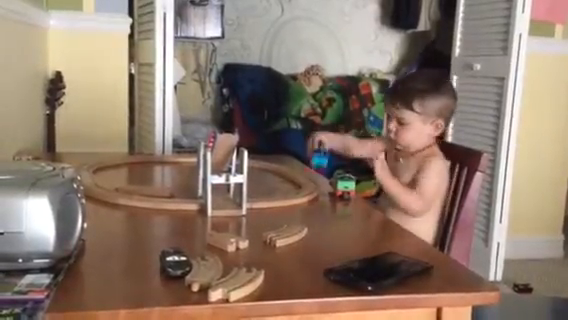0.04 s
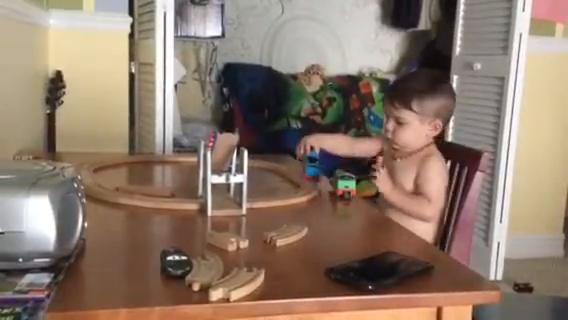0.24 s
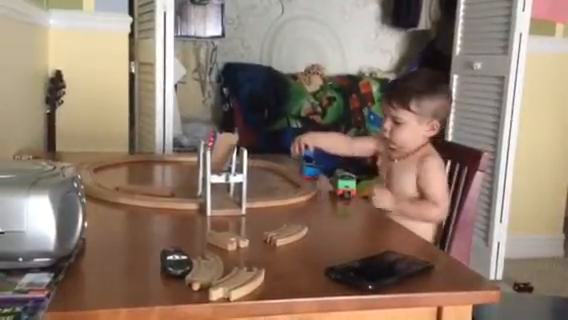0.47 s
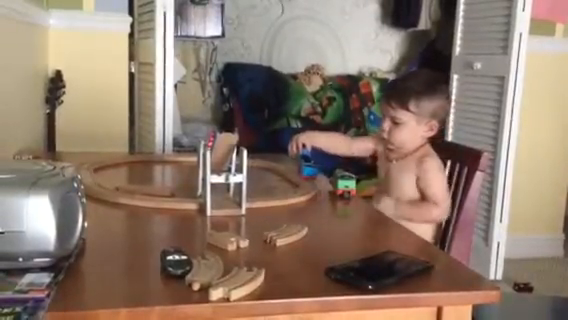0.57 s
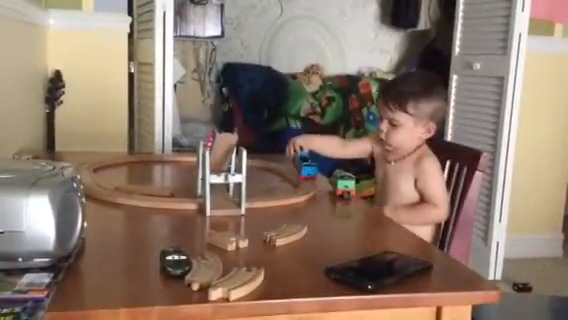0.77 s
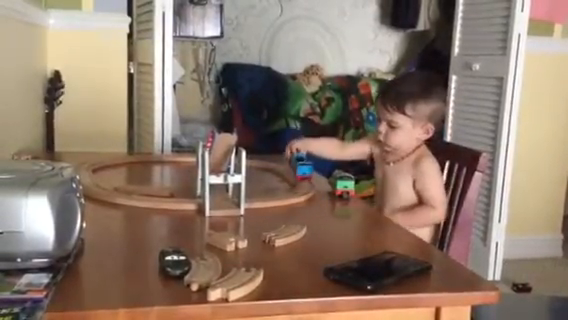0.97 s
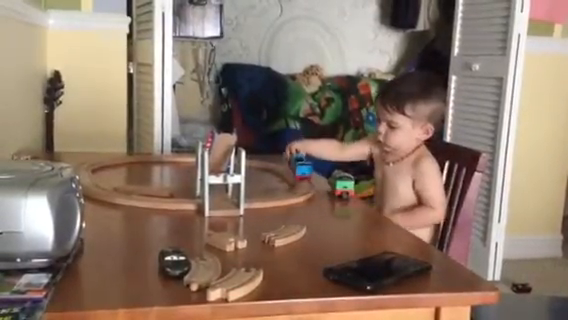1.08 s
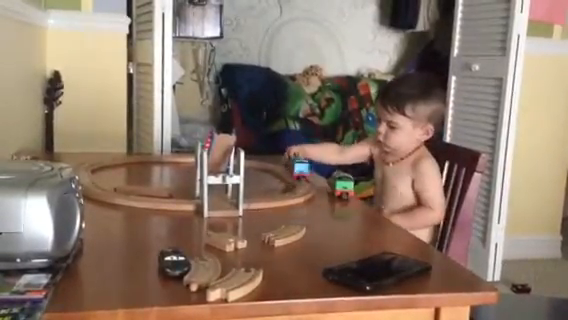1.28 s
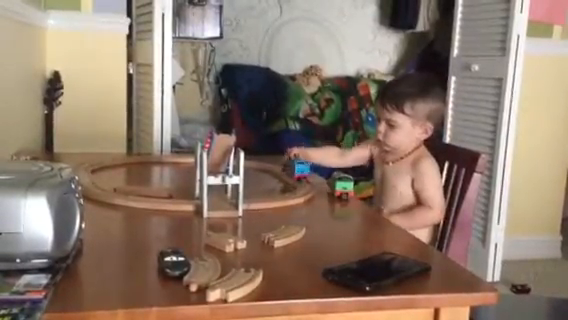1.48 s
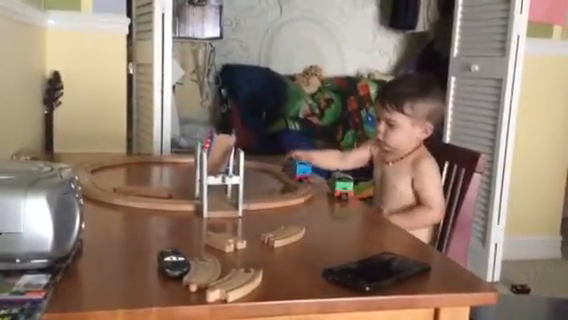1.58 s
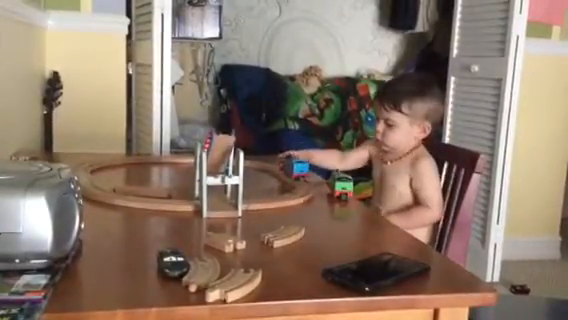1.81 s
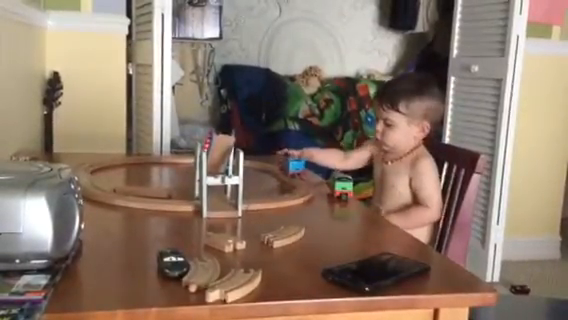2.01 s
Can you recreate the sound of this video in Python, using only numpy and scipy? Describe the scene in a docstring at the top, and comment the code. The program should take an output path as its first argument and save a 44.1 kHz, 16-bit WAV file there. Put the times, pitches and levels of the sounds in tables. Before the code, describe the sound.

A toy train clacks down on wooden rails on a table, then rolls in two short pushes, its plastic wheels clicking and rubbing between light knocks. The microphone is nearby in a small room with a faint hum.

```python
"""A tick, then a clack: a small plastic toy engine lands on a wooden track on a living-room table. It creeps,
then is pushed along twice. Its loose wheels click against their axles and rub in the grooves, the wood grain
rattles its plastic body, and its coupling ticks. Knocks against the rails ring the track, and the table top
thuds and rumbles underneath. The room rings briefly over a low, wavering hum."""
import sys
import numpy as np
from scipy import signal
from scipy.fft import rfft, irfft
from scipy.io import wavfile

SR = 44100
rng = np.random.default_rng(int(sys.argv[2]) if len(sys.argv) > 2 else 0)


def wav_record(signal):
    """Record a signal, one row per channel, as 16-bit PCM in the file named by sys.argv[1]."""
    frames = np.transpose(np.atleast_2d(signal))
    bounded = np.clip(frames, -1, 1)
    # unit amplitude maps onto the largest positive 16-bit level
    quanta = np.round(bounded * 32767).astype(np.int16)
    wavfile.write(sys.argv[1], SR, quanta)


N = 90404
TIME = np.arange(N) / SR

# A loose wheel clicks on its axle. Each row: start in seconds, relative level in dB.
AXLE_CLICKS = [(0.4600, -35), (0.5040, -37), (0.5260, -43), (0.7530, -29.5), (0.7608, -24), (0.7690, -28),
               (0.7803, -18.5), (0.7910, -19.5), (0.8015, -19.5), (0.8045, -23.5), (0.8125, -29),
               (0.8258, -27), (0.8412, -19.5), (0.8565, -17.5), (0.8684, -18.5), (0.8712, -18),
               (0.8812, -28), (0.8950, -16), (0.9060, -18.5), (0.9248, -22), (0.9418, -25.5), (0.9545, -26),
               (0.9680, -31.5), (0.9822, -20.5), (1.0080, -28.5), (1.0302, -38), (1.0460, -26.5),
               (1.0660, -23), (1.0920, -26), (1.3660, -24.5), (1.3870, -40.5), (1.4140, -35), (1.5768, -26),
               (1.5926, -22), (1.6510, -23.5), (1.6600, -28), (1.6778, -23.5), (1.7045, -26.5),
               (1.7100, -22.5), (1.7256, -37), (1.7576, -27.5), (1.7752, -29), (1.9578, -39)]
# Light ticks of the coupling. Each row: start in seconds, relative level in dB.
COUPLING_TICKS = [(0.2086, -27.5), (0.6890, -42), (0.7206, -34), (1.3670, -21), (1.512, -40.5),
                  (1.6300, -25.5), (1.8600, -43)]
# How hard the wheels roll. Each row: time in seconds, relative level in dB.
PUSH_LEVEL = [(0.0, -76), (0.445, -61), (0.47, -53.5), (0.53, -51.5), (0.59, -58.5), (0.73, -54),
              (0.79, -48), (0.89, -45.5), (1.02, -52.5), (1.09, -50), (1.14, -75), (1.34, -73.5),
              (1.38, -54.5), (1.48, -84), (1.56, -64), (1.60, -42.5), (1.73, -44.5), (1.79, -56.5),
              (1.93, -74.5), (1.98, -53), (2.05, -57.5)]
# Plastic skids on wood. Each row: start in seconds, length in seconds, peak level in dB.
WHEEL_SKIDS = [(0.298, 0.019, -59), (0.441, 0.09, -67), (0.632, 0.027, -73), (1.068, 0.02, -55),
               (1.598, 0.034, -62.5), (1.64, 0.022, -64), (1.702, 0.012, -61), (1.711, 0.014, -56.5),
               (1.95, 0.015, -75)]
# The engine knocks on the track. Each row: start in seconds, relative level in dB,
# offset for the table's thud in dB, offset for the bright crack in dB.
TRACK_KNOCKS = [(0.23, -22.5, -18, 7.5), (0.2330, -11, -20, 4), (0.237, -23, 13.5, 6),
                (0.248, -22.5, -21, 10.5), (0.2580, -19, -4, -20), (0.265, -25.5, 5.5, -22),
                (0.3052, -26.5, -23, -2), (0.6258, -38.5, -15, -26), (0.6873, -47, -14, -8),
                (1.07, -33, -3, 1), (1.0744, -25.5, 9, -8), (1.0788, -29.5, 8.5, -1),
                (1.3667, -32.5, 11.5, 1), (1.5785, -52.5, 36.5, 6), (1.5940, -31.5, 10.5, -3.5),
                (1.6, -30.5, 5, 1.5)]
# A rail shifts. Each row: start in seconds, relative level in dB, pitch as a ratio to the rail's own.
RAIL_BUMPS = [(0.4760, -43, 1.0), (0.4930, -51, 1.33), (0.6265, -46.5, 1.26), (0.631, -38.5, 0.98),
              (0.6920, -47, 1.2), (1.0750, -34, 1.27)]
# Fader moves for the table's rumble and the hum. Each row: time in seconds, relative level in dB.
RUMBLE_LEVEL = [(0.0, -86), (0.44, -71.5), (0.48, -67.5), (0.74, -65.5), (0.85, -52), (1.09, -53.5),
                (1.14, -86), (1.35, -75), (1.38, -55), (1.44, -55), (1.50, -81), (1.56, -69), (1.60, -52.5),
                (1.80, -56), (1.92, -64.5), (2.05, -50.5)]
HUM_SWELLS = [(0, -3.5), (0.5, 2), (0.65, -12), (0.9, 2), (1.2, -11.5), (2.05, -6)]

# The resonances of each object. Each row: frequency in Hz, width in Hz, relative level in dB.
SHELL_MODES = [(842, 31, -16.5), (1266, 110, -17.5), (1835, 97, -4), (2142, 174, 5.5), (2312, 329, 0),
               (2810, 114, -5.5), (3590, 346, -12), (4034, 250, -13), (4280, 226, -20.5),
               (5140, 660, -21.5), (6410, 780, -26), (8780, 640, -32.5), (13500, 3000, -43)]
WHEEL_MODES = [(1773, 3.2, 19), (1820, 10, 17), (1898, 11.5, -8), (1860, 14, -1.5), (1990, 8.8, -7.5),
               (2140, 21, -15), (2200, 9.5, -5.5), (2218, 36, -4.5)]
COUPLING_MODES = [(1330, 500, -7), (2740, 540, -7), (3700, 190, 5), (4900, 1300, -10.5), (6430, 420, -11),
                  (8300, 430, -17.5)]
TRACK_MODES = [(446, 160, -14), (645, 40, -3.5), (885, 250, -8), (1134, 44, -1), (1251, 127, 0.5),
               (1370, 110, 2), (1551, 70, 5), (2085, 320, -2.5), (2580, 96, 3), (2812, 85, 3),
               (3620, 190, -1.5), (3980, 130, -4), (4310, 120, -2), (4390, 32, -3.5), (5230, 150, -7.5),
               (6070, 890, -15.5), (9200, 760, -22.5)]
RAIL_MODES = [(643, 31, -1), (902, 210, -18.5), (1080, 250, -10.5)]
TABLE_MODES = [(119, 31, -6), (161, 21, -2), (206.7, 22, 0.5), (245.8, 17.7, 2.5), (295, 40, -4.5),
               (378, 67, -3.5), (468, 87, -10), (623, 43, -10.5)]

# Tone curves of the noises and the reflections. Each row: frequency in Hz, relative level in dB.
RUB_EQ = [(400, -12.5), (800, 7), (2000, 12), (2750, -13), (3100, -17), (3500, -15), (3800, 10), (4300, -7),
          (5000, -9.5), (9000, -18), (12000, -18.5), (16000, -25)]
SKID_EQ = [(1500, -7), (4000, -28), (7000, 5), (10500, 3), (14500, 7), (16000, -34)]
CRACK_EQ = [(500, -11.5), (1200, -11), (3000, 0), (6500, -8), (9000, -8), (12000, -24.5), (16000, -46.5)]
REVERB_EQ = [(80, 7.5), (300, 0.5), (800, 2), (2000, -5), (4500, 1.5), (9000, -1), (16000, -4)]
ROOM_TONE_EQ = [(20, -38), (33, -28), (45, 7), (60, 1), (100, 5), (150, -12.5), (250, -21.5), (400, -20),
                (1000, -27), (2100, -38.5), (2800, -29), (3800, -24.5), (5000, -28), (7000, -26.5),
                (9000, -28), (10500, -31), (16000, -36.5)]
# The room's decay. Each row: frequency in Hz, time to fall 60 dB in seconds.
REVERB_T60 = [(80, 0.55), (260, 0.27), (700, 0.19), (1900, 0.37), (4800, 0.26), (9000, 0.2), (16000, 0.199)]

# Tiny rebounds after a contact: time constant in seconds, energy against the contact in dB.
KNOCK_SCUFF, CLICK_SCUFF = (0.00093, 9.5), (0.0014, 2.5)
# Mix trims, added to the levels in the tables.
CLICK_DB, TICK_DB, ROLL_DB, RUB_DB = 14, 8, -2, -3
TRACK_DB, CRACK_DB, BUMP_DB = 17, 4.5, 17.5
THUD_DB, RUMBLE_DB, HUM_DB = -2, -1, -56


def engine(grain):
    """Clicks and wood grain ring the plastic body; the wheels rub in the grooves and the coupling ticks."""
    shell = body(SHELL_MODES)
    click_starts, click_db = np.transpose(AXLE_CLICKS)
    clicks = strikes(click_starts, click_db + CLICK_DB, shell, *CLICK_SCUFF)
    push = fader(PUSH_LEVEL)
    roll = from_db(ROLL_DB) * through(push * grain, shell)
    rub = from_db(RUB_DB) * push * coloured(slips(per_s=1400), RUB_EQ)
    tick_starts, tick_db = np.transpose(COUPLING_TICKS)
    ticks = strikes(tick_starts, tick_db + TICK_DB, body(COUPLING_MODES), *CLICK_SCUFF)
    return clicks + roll + rub + ticks


def wood_grain(bumps_per_s=600, spread_db=2.5):
    """Force under the rolling wheels: small random bumps of the grain, rms 1."""
    sizes = from_db(spread_db * np.minimum(rng.exponential(1, N), 3))
    signs = rng.choice([-1, 1], N)
    return rms_one(sizes * signs * (rng.random(N) < bumps_per_s / SR))


def skids():
    """Plastic skids on the wood: brief swells of dense slips make a fine, bright hiss."""
    swells = sum(from_db(db) * np.sin(np.pi * np.clip((TIME - start) / length, 0, 1))
                 for start, length, db in WHEEL_SKIDS)
    return swells * coloured(slips(per_s=2500), SKID_EQ)


def slips(per_s):
    """Friction texture: tiny random slips of every size."""
    return rng.standard_normal(N) * (rng.random(N) < per_s / SR)


def wheel_ring(toy, gain_db=-19.5):
    """The wheels ring on in sympathy with the rest of the toy."""
    return from_db(gain_db) * through(toy, body(WHEEL_MODES))


def track(crack_rise_s=0.0021, crack_decay_s=0.009):
    """A hard edge on wood: each knock cracks brightly and rings the track; a loose rail bumps hollowly."""
    starts, db, _, crack_db = np.transpose(TRACK_KNOCKS)
    t = TIME[:SR // 20]
    envelope = (1 - np.exp(-t / crack_rise_s)) * np.exp(-t / crack_decay_s)
    crack = envelope * coloured(rng.standard_normal(len(t)), CRACK_EQ)
    wood = strikes(starts, db + TRACK_DB, body(TRACK_MODES), *KNOCK_SCUFF)
    cracks = strikes(starts, db + crack_db + CRACK_DB, crack, *KNOCK_SCUFF)
    bumps = np.zeros(N)
    for start, bump_db, pitch in RAIL_BUMPS:
        rail = body(np.array(RAIL_MODES) * [pitch, 1, 1])
        bumps += strikes([start], [bump_db + BUMP_DB], rail, *KNOCK_SCUFF)
    return wood + cracks + bumps


def table(grain):
    """The low end: the table top thuds under the knocks and rumbles under the wheels."""
    starts, db, thud_db, _ = np.transpose(TRACK_KNOCKS)
    top = body(TABLE_MODES)
    thuds = strikes(starts, db + thud_db + THUD_DB, top, *KNOCK_SCUFF)
    rumble = from_db(RUMBLE_DB) * fader(RUMBLE_LEVEL) * through(grain, top)
    return thuds + rumble


def room_response(onset_s=0.0036):
    """Dense reflections build up quickly and die away at their own rate in each band."""
    t, edges = TIME[:SR // 2], np.geomspace(50, 18000, 15)
    build_up = 1 - np.exp(-(t / onset_s) ** 2)
    tail = 0
    for low, high in zip(edges, edges[1:]):
        hz = np.sqrt(low * high)
        bandpass = signal.butter(2, [low, high], "band", fs=SR, output="sos")
        band = signal.sosfilt(bandpass, rng.standard_normal(len(t)))
        decay = from_db(-60 * t / at_hz(REVERB_T60, hz))
        gain = np.sqrt(2 * (high - low) / SR) * from_db(at_hz(REVERB_EQ, hz))
        tail = tail + gain * energy_one(band * build_up * decay)
    return tail


def background(room_tone_db=-65, hum_hz=72.4, hum_width_hz=7.7):
    """The bed: faint room tone and a narrow band of noise heard as a low, wavering hum."""
    hum = resonate(rng.standard_normal(N + SR), hum_hz, hum_width_hz)
    hum = resonate(hum, hum_hz, hum_width_hz)[SR:]  # one second of pre-roll lets it build
    room_tone = from_db(room_tone_db) * coloured(rng.standard_normal(N), ROOM_TONE_EQ)
    return room_tone + from_db(HUM_DB) * fader(HUM_SWELLS) * rms_one(hum)


def strikes(starts, levels_db, response, scuff_s, scuff_db):
    """A run of hits on one object: each a sharp contact and a short scuff of tiny rebounds."""
    out, t = np.zeros(N + SR), TIME[:SR // 20]
    for start, db in zip(starts, levels_db):
        rebounds = rng.standard_normal(len(t)) * t * np.exp(-t / scuff_s)
        force = from_db(scuff_db) * energy_one(rebounds)
        force[0] += 1  # the contact itself
        hit = energy_one(signal.fftconvolve(force, response))
        first = int(start * SR)
        out[first:first + len(hit)] += from_db(db) * hit
    return out[:N]


def body(modes):
    """An object's impulse response: parallel resonances of alternating polarity, energy 1."""
    tap = signal.unit_impulse(SR // 2)
    return energy_one(sum((-1) ** k * from_db(db) * resonate(tap, hz, width)
                          for k, (hz, width, db) in enumerate(modes)))


def resonate(x, hz, width_hz):
    """One resonance, unity gain at its peak."""
    radius = np.exp(-np.pi * width_hz / SR)
    feedforward = np.array([1, 0, -1]) * (1 - radius ** 2) / 2
    feedback = [1, -2 * radius * np.cos(2 * np.pi * hz / SR), radius ** 2]
    return signal.lfilter(feedforward, feedback, x + 1e-18)


def through(x, response):
    """Play x through an impulse response."""
    return signal.fftconvolve(x, response)[:N]


def coloured(noise, eq):
    """Shape a noise with a tone curve; rms 1."""
    gains = from_db(at_hz(eq, np.fft.rfftfreq(len(noise), 1 / SR)))
    return rms_one(irfft(rfft(noise) * gains, len(noise)))


def fader(points):
    """Gain over time from points in seconds and dB."""
    return from_db(np.interp(TIME, *np.transpose(points)))


def at_hz(points, hz):
    """Read a curve on a log-frequency axis."""
    frequencies, values = np.transpose(points)
    return np.interp(np.log(np.maximum(hz, 1)), np.log(frequencies), values)


def from_db(db):
    """Decibels to gain."""
    return 10 ** (np.asarray(db) / 20)


def rms_one(x):
    """Scale to rms 1."""
    return x / np.sqrt(np.mean(x ** 2) + 1e-20)


def energy_one(x):
    """Scale to energy 1."""
    return x / np.sqrt(np.sum(x ** 2) + 1e-20)


def scene(toy_send_db=-3.5, track_send_db=-3.5, table_send_db=-1.5):
    """The mono mix: engine, track and table, each with a send to the room, over the background."""
    grain = wood_grain()
    toy = engine(grain) + skids()
    rails, top = track(), table(grain)
    send = from_db(toy_send_db) * toy + from_db(track_send_db) * rails + from_db(table_send_db) * top
    reverb = through(send, room_response())
    return (toy + wheel_ring(toy) + rails + top + reverb + background())[None]


def record(dry, cutoff_hz=15900):
    """A steep low-pass takes off the very top."""
    return signal.sosfilt(signal.ellip(10, .1, 70, cutoff_hz, fs=SR, output="sos"), dry)


dry = scene()
out = record(dry)
wav_record(out)
```